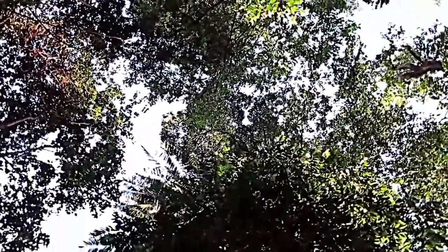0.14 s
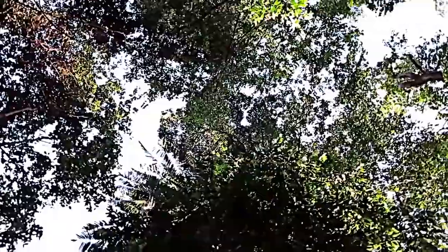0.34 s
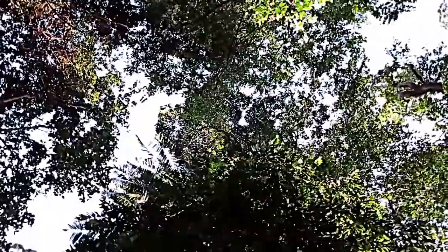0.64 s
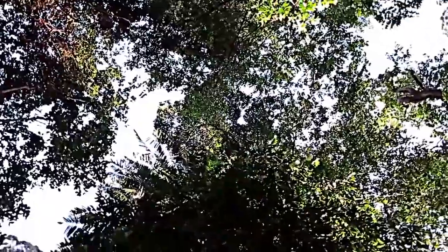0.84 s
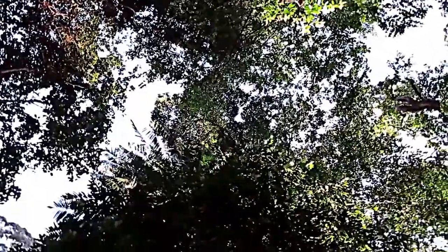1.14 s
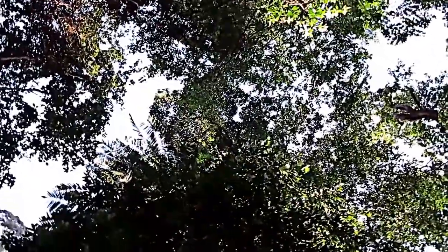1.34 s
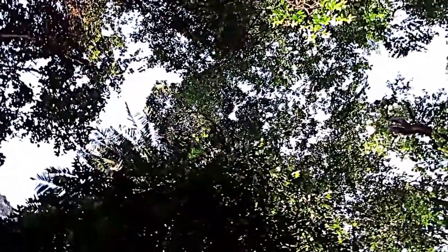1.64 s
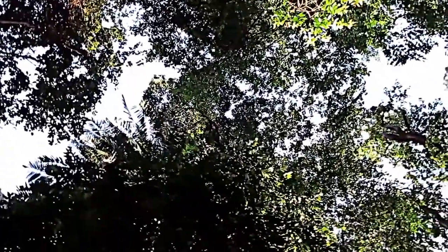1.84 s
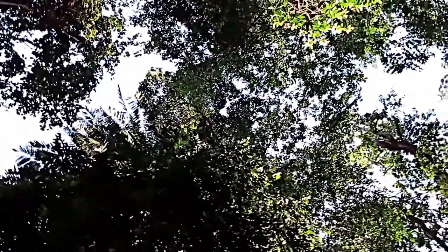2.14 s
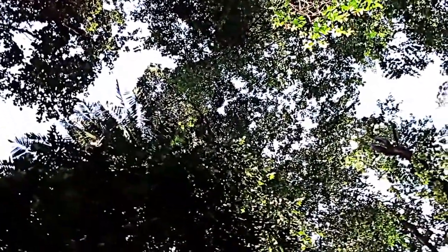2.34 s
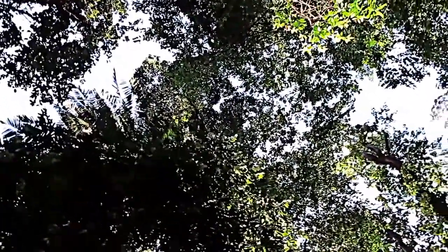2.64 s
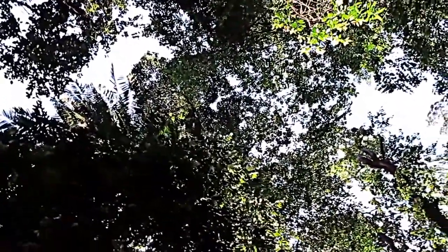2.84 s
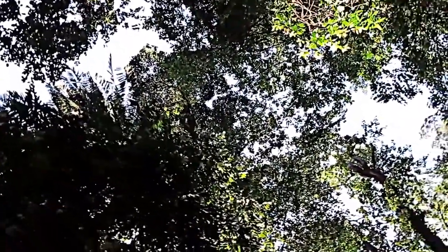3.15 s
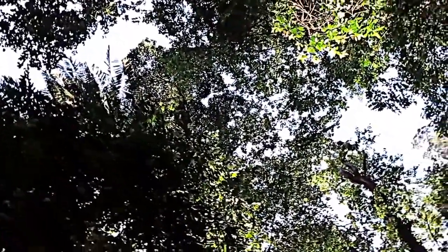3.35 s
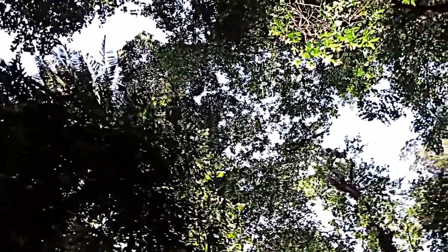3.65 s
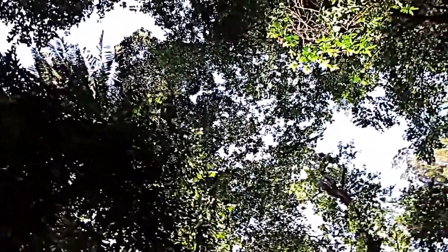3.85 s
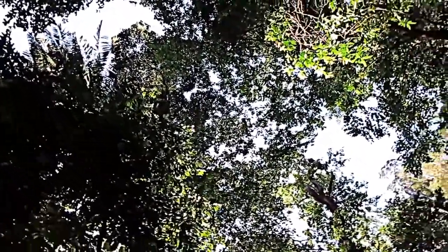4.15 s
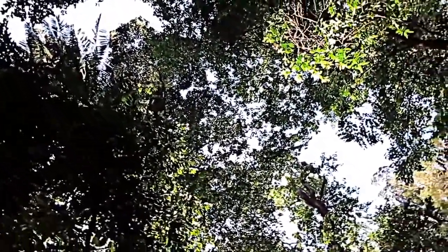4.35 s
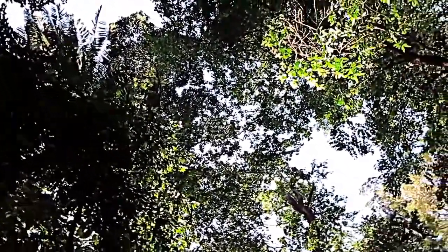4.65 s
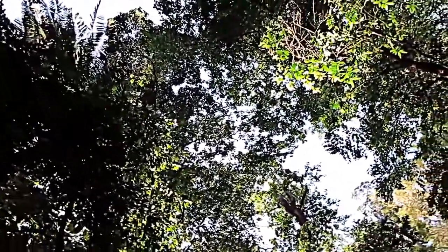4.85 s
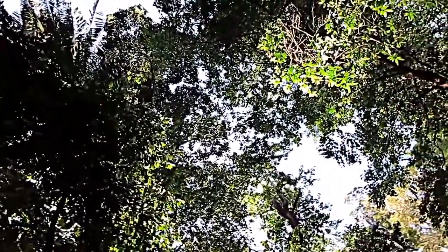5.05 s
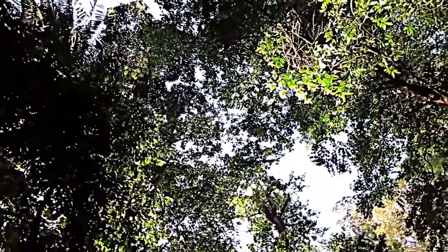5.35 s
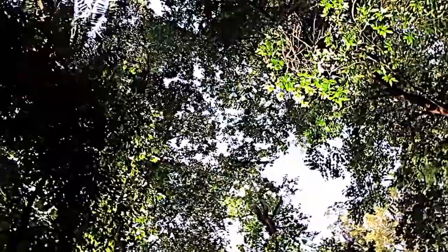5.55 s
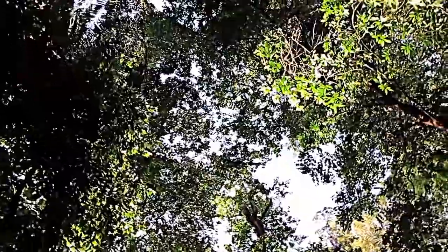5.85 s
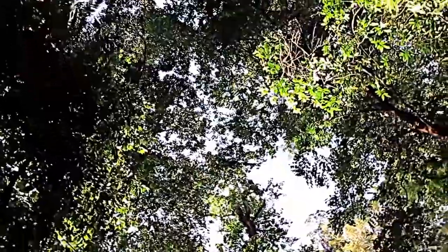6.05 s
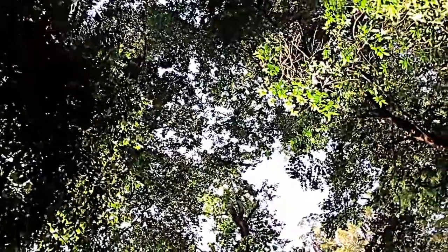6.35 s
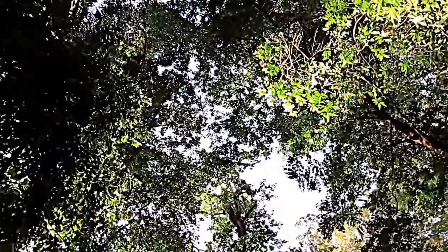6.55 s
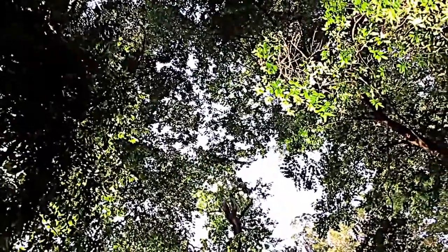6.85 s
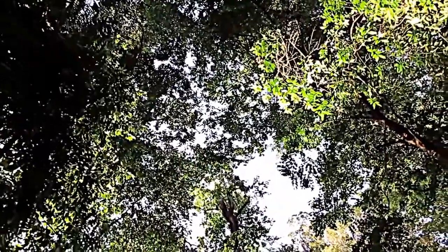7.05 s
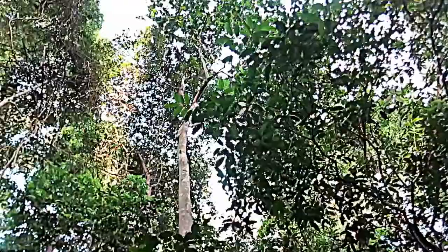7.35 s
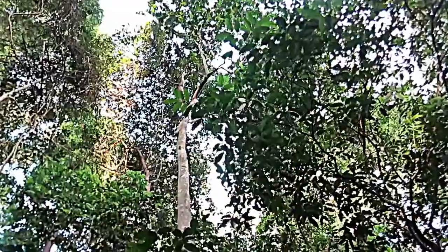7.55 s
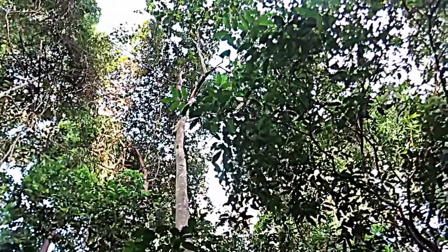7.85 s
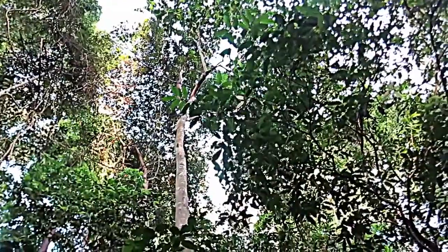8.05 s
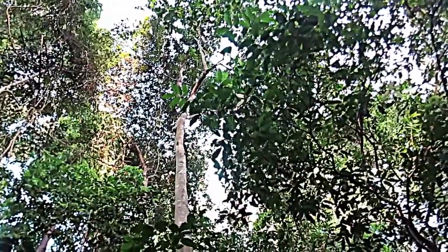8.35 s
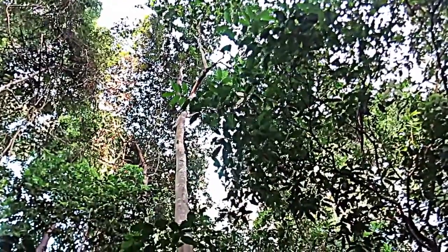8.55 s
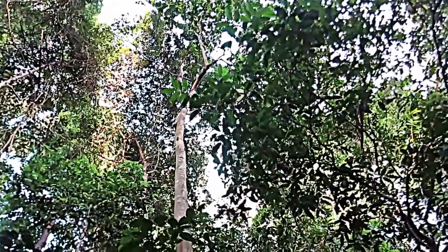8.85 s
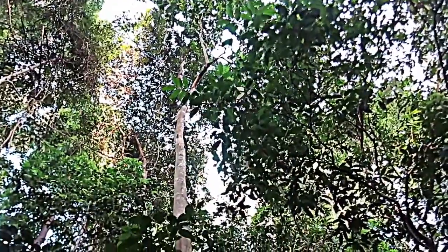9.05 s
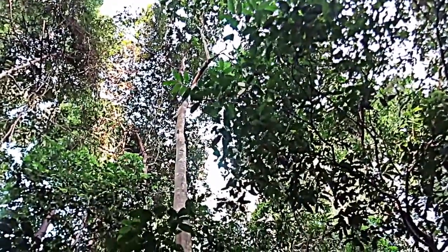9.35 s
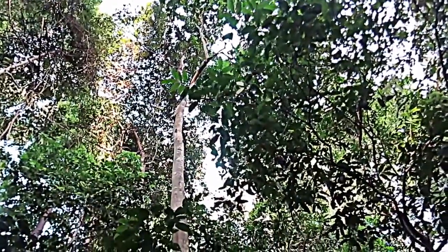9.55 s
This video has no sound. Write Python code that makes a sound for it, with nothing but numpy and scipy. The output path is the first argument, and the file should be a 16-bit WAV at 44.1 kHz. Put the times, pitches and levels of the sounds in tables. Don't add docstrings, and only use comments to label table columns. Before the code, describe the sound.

Among forest trees, a large cicada buzzes loosely, beats a string of rapid bursts, then launches a loud, piercing whine that slowly falls in pitch and breaks into a slowing rattle. A dry tap lands close by and a far bird gives quick rising whistles. After a tiny silent gap, buzz, bursts and whine come again. A patchy far cicada chorus and faint town rumble lie beneath, in wide outdoor stereo.

```python
import sys
import numpy as np
from scipy import signal
from scipy.fft import rfft, irfft, next_fast_len
from scipy.io import wavfile
from scipy.ndimage import uniform_filter1d, map_coordinates

SR = 44100
rng = np.random.default_rng(int(sys.argv[2]) if len(sys.argv) > 2 else 0)


def nominal_scale(level):
    x = np.asarray(level, float) / 20
    return 10 ** x


def to_wav(s):
    ch = np.atleast_2d(s).T
    pcm = np.round(np.clip(ch, -1, 1) * 32767)
    wavfile.write(sys.argv[1], SR, pcm.astype(np.int16))


N = 427769
T = np.arange(N) / SR
SIZE = next_fast_len(N + SR // 2)
CUT_S, RESUME_S = 7.3135, 7.415
RETURN_DB = 1

# whine_onset_s, level_db, upper_resonance_dulling_db, upper_flare_lift_db
PASSES = [
    (1.828, 0.35, 0.16, 8.5),
    (8.66, 0, -3, 4),
]


def evened(x, span=None):
    power = x ** 2 if x.ndim == 1 else (x ** 2).mean(0)
    if span:
        width = int(span * SR)
        mean = uniform_filter1d(uniform_filter1d(power, width), width)
    else:
        mean = power.mean()
    return x / np.sqrt(abs(mean) + 1e-20)


def read(points, hz, **ends):
    f, value = np.transpose(points)
    return np.interp(np.log(hz + 1), np.log(f + 1), value, **ends)


def colour(points):
    hz = abs(np.fft.fftfreq(4096, 1 / SR))
    log_gain = np.log(nominal_scale(read(points, hz, left=-80, right=-80)))
    impulse = np.fft.ifft(np.exp(np.conj(signal.hilbert(log_gain)))).real
    return rfft(impulse[:2048], SIZE)


def bump(s, half_s):
    return np.exp(-((T - s) / half_s) ** 2 / 2)


def noise(points, patchy_db):
    # hz, left_right_likeness (0-1)
    likeness = [(30, 0.72), (90, 0.98), (300, 0.83), (700, 0.56), (1500, 0.89), (3000, 1), (6000, 0.28),
                (12000, 0.7)]
    frames, hz = N // 256 + 5, np.fft.rfftfreq(1024, 1 / SR)
    a, b, c, d, patches = rng.standard_normal((frames, 513, 5), dtype=np.float32).T
    patches = uniform_filter1d(patches, size=8, axis=0)
    patches = evened(uniform_filter1d(patches, size=12, axis=1))
    same = np.clip(read(likeness, hz), -1, 1)[:, None]
    left = a + 1j * b
    right = same * left + np.sqrt(1 - same ** 2) * (c + 1j * d)
    level_db = read(points, hz, left=-89, right=-88.5)[:, None] + patchy_db * patches
    z = np.array([left, right]) * nominal_scale(level_db)
    return evened(signal.istft(z, nperseg=1024, noverlap=768)[1][:, :N])


def forest(t60, shared):
    count = SR // 50
    taps = np.zeros((3, 20 * count + 40))
    at = 20 * np.arange(1, count + 1) + rng.integers(0, 20, (3, count))
    sign = rng.choice([-1., 1.], at.shape)
    np.put_along_axis(taps, at, sign * nominal_scale(-60 * at / SR / t60), 1)
    shared = np.clip(shared, 0, 1)
    ears = shared * taps[2] + np.sqrt(1 - shared ** 2) * taps[:2]
    return rfft(ears, SIZE) / np.linalg.norm(taps[0])


def clicks(s, db, jitter_s, scatter_db):
    shake = rng.standard_normal((600, 2))[:len(s)]
    place = (s + jitter_s * shake[:, 0]) * SR
    index = np.floor(place).astype(int)[:, None] + np.arange(-7, 9)
    u = index - place[:, None]
    shape = np.sinc(u) * np.cos(np.pi * u / 16) ** 2
    level = nominal_scale(db + scatter_db * shake[:, 1:])
    return index.clip(0, N - 1).ravel(), (shape * level).ravel()


def summed(parts):
    return rfft(np.bincount(*map(np.concatenate, zip(*parts)), minlength=N), SIZE)


def town_rumble():
    # hz, level_db_per_hz
    spectrum = [(12, -45), (20, -25.5), (80, 1.5), (106, -1.5), (156, -4.5), (235, -3.5), (576, -13),
                (958, -17.5), (1380, -25), (1590, -23.5), (1800, -27.5), (2600, -27), (3380, -54),
                (5720, -120)]
    level_db = -41.5 + RETURN_DB * (T > CUT_S)
    return nominal_scale(level_db) * noise(spectrum, 0.72) * nominal_scale(np.array([[.4], [-.4]]))


def town_hum():
    wander = 3 * evened(uniform_filter1d(rng.standard_normal(N), size=8000))
    return np.sqrt(2) * nominal_scale(-50) * np.sin(2 * np.pi * 112 * T + wander)


def low_insect():
    # time_s, peak_db, half_length_s
    swell_times = [(.3, -57, 0.89), (2.75, -56.5, 0.5), (5.147, -57.5, 0.42), (7.0, -72, 0.39),
                   (7.801, -58, 0.56), (9.7, -65, 0.27)]
    band = noise([(1450, -35), (1540, -6.0), (1640, -2.0), (1750, -34.5)], 2.2)
    return sum(nominal_scale(db) * bump(s, half) for s, db, half in swell_times) * band


def chorus():
    # hz, level_db_per_hz
    spectrum = [(2700, -23.5), (3350, -10.5), (4070, 3.5), (4680, 4.5), (5500, -4.5), (6260, -12),
                (7570, -3.5), (8470, -14), (9300, -12.5), (10300, -28), (12300, -30.5), (13200, -58)]
    # from_s, to_s
    hush_times = [
        (2.15, 4.6),
        (8.95, 9.9),
    ]
    hushed = sum(1. * (T > start) * (T < end) for start, end in hush_times)
    hushed = uniform_filter1d(hushed, size=SR // 4)
    level_db = -30.5 + RETURN_DB * (T > CUT_S) - 4 * hushed
    return nominal_scale(level_db) * noise(spectrum, 1.8) * nominal_scale(np.array([[-1.5], [1.5]]))


def bird():
    # start_hz, end_hz
    rises = [
        (1831, 2820),
        (1753, 2275),
        (2210, 2950),
    ]
    # time_s, peak_db
    whistles = [
        [(1.8248, -38.5), (2.3396, -40.5), (2.5122, -42), (2.6858, -45), (2.8574, -42.5), (3.03, -42), (3.3124, -38.5), (3.7609, -37.5), (3.8901, -43), (4.0547, -39), (4.4987, -40), (4.8279, -38.5), (4.9945, -37), (5.1233, -34.5), (5.8087, -36.5), (5.9434, -39.5), (6.0394, -44.5)],
        [(3.6232, -50), (4.3405, -48), (5.3652, -47), (5.693, -41)],
        [(3.1582, -33)],
    ]
    out, u = np.zeros(N), np.linspace(0, 1, 2000)
    for (start_hz, end_hz), times in zip(rises, whistles):
        hz = start_hz + (end_hz - start_hz) * u ** .8
        tone = np.sin(np.pi * u) ** 0.18 * np.sin(2 * np.pi * np.cumsum(hz) / SR)
        for s, db in times:
            at = int((s - .012) * SR)
            out[at:at + len(u)] += nominal_scale(db) * tone
    echoed = rfft(out, SIZE) * (1 + nominal_scale(1.5) * forest(0.86, 1.0))
    return nominal_scale(-8.0) * irfft(echoed, SIZE)[:, :N]


def tap():
    # time_s, peak_db
    tap_time = [
        (1.538, -22),
    ]
    (s, db), = tap_time
    shell = colour([(300, -12), (700, 3), (1800, 2), (2700, -1), (3300, -24)])
    ring = irfft(summed([clicks(np.array([s]), 0, 0, 0)]) * shell, SIZE)[:N]
    return nominal_scale(db) * ring / abs(ring).max()


def beats(rows):
    s, rate = np.transpose(rows)
    t = np.arange(s[0], s[-1], 1 / SR)
    turns = np.cumsum(np.interp(t, s, rate)) / SR
    at = np.interp(np.arange(int(turns[-1]) + 1), turns, t)
    return at, 1 / np.interp(at, s, rate)


def beat(s, drum, db, jitter_us, scatter_db, spread=1, drift_us=0):
    # after_ms, level_db
    ribs = [
        [(0, 0), (.55, -5), (1.38, -8.5), (1.85, -13)],
        [(0, 0.5), (.81, -5.5), (1.3, -9), (2.02, -7.5)],
    ]
    s = s + jitter_us / 1e6 * rng.standard_normal(600)[:len(s)]
    drift = uniform_filter1d(uniform_filter1d(rng.standard_normal((4, 600)), size=26), size=26)
    rib_clicks = []
    for (after_ms, rib_db), slow in zip(ribs[drum], drift):
        late_s = spread * after_ms / 1e3 + drift_us / 935000.0 * evened(slow)[:len(s)]
        rib_clicks.append(clicks(s + late_s, db + rib_db, jitter_us / 988000.0, scatter_db))
    return rib_clicks


def whine_beats():
    # time_s, beats_per_s
    whine_rates = [
        [(1.83, 161.6)] + [(2.06, 160.1), (2.08, 160.5), (2.36, 158.6), (2.84, 156.9), (4.39, 150.3), (4.72, 148.3)],
        [(8.66, 161.2)] + [(8.9, 159.8), (8.91, 160.2), (9.308, 157.8), (9.7, 156.7)],
    ]
    # time_s, beats_per_s
    neighbour = [
        (8.0, 153),
        (8.68, 150.5),
    ]
    whine, slack = [], []
    for rows, end in zip(whine_rates, (4.76, np.inf)):
        s, cycle = beats(rows)
        jitter_us = 2.4 + 45 * np.clip(1 - (end - s) / .16, 0, 1) ** 2
        tight = np.clip((s - s[0] - .19) / 0.084, 1e-3, 1 - 1e-3)[:, None]
        for drum, late in enumerate((0, .503)):
            at = s + late * cycle
            whine += beat(at, drum, 20 * np.log10(tight), jitter_us, .22, drift_us=36)
            slack += beat(at, drum, 20 * np.log10(1 - tight), 16, 2.5, drift_us=132)
    whine += beat(beats(neighbour)[0], 0, -0.5, 2.9, 0.68, drift_us=51)
    return whine, slack


def rattle_beats():
    # time_s, groups_per_s
    group_rates = [
        [(4.72, 110), (5.02, 104), (5.4, 87.4), (5.9, 70.7), (6.47, 64.7), (7.32, 56)],
    ]
    # after_start_s, level_db
    group = [
        (0, -11),
        (.0032, -10.5),
        (.0064, -18),
    ]
    rattle = []
    for rows in group_rates:
        s = beats(rows)[0]
        for k, (after, db) in enumerate(group):
            rattle += beat(s + after, k % 2, db + 8.0, 109, 0.87, spread=0.46, drift_us=120.3)
    return rattle


def burst_beats():
    # time_s, peak_db
    bursts = [(1.209, -11), (1.275, -17), (1.3342, -9), (1.402, -15), (1.465, -9), (1.5288, -2.5),
              (1.5916, 0), (1.656, -3.5), (1.724, -8), (1.7938, -14), (8.0546, -15), (8.124, -15.5),
              (8.18, -14), (8.2461, -12), (8.308, -15), (8.3723, -15.5), (8.4357, -18), (8.5083, -15),
              (8.5767, -17), (8.6404, -23)]
    after = np.arange(5) / 325
    swell_db = 18.0 - 350 * abs(after - .005)
    out = []
    for s, db in bursts:
        out += beat(s + after, 1, (db + swell_db)[:, None], 156, 0.89, spread=0.783)
    return out


def buzz_beats():
    # from_s, to_s
    spans = [
        (0, 1.19),
        (7.4, 8.03),
    ]
    buzz = []
    for start, end in spans:
        buzz += beat(np.arange(start, end, 1 / 330), 0, 0, 293.0, 2.7)
    return buzz


def drums():
    whine, slack = whine_beats()
    return summed(whine), summed(rattle_beats() + burst_beats()), summed(slack + buzz_beats())


def posture():
    # after_whine_onset_s, effort_db, abdomen_slackness (0-1)
    phrase = [(-1.75, -27.5, 0.65), (-1.41, -29.5, 0.85), (-1.19, -27.5, 0.96), (-0.81, -28, 0.98),
              (-0.48, -26, 0.41), (-0.35, -24, 0), (-0.13, -28, 0.28), (0.07, -32, .75), (.13, -34, 0.97),
              (0.1962, -34, 1), (0.26, -21, 0.1), (0, -18.5, 0.02), (3, -17, 0.1), (3, -20, 0),
              (4.5, -23, 0.29), (5.5, -24.5, .45)]
    # time_s, change_db, half_length_s
    swells = [(.41, 4, 0.026), (0.57, -3, 0.16), (2.183, -2.5, 0.02), (2.572, 1.5, .06), (3.297, -1, 0.036),
              (3.925, 3, 0.043), (4.057, -2.5, 0.099), (4.35, 0.5, 0.037), (4.612, 0.5, 0.089),
              (7.45, -0.5, 0.11), (8.604, 2.5, 0.068), (9.008, 1, 0.088)]
    # tight_db, slack_db, bend (exponent), added_in_rattle_db
    stances = [
        (-10.5, 7.5, 1.08, 0.2),
        (-51.5, -7.5, 0.63, -6),
        (-37.5, -23.5, 0.38, 5.5),
        (-3.5, -7, 2.6, 0.8),
    ]
    onset, level_db, dull_db, lift_db = np.transpose(PASSES)[:, (T > CUT_S).astype(int)]
    s, effort_db, slack = np.transpose(phrase)
    since = T - onset
    slack = np.interp(since, s, np.clip(slack, 1e-3, 1.2))
    rattling = np.clip((since - 2.75) / .15, 0, 1)
    rattling = rattling + (since > -0.55) * (since < 0)
    rise_s, fall_s = .17, .035
    flare = np.exp(-np.where(since < 0, -since / rise_s, (since / fall_s) ** 2 / 2))
    body_db = np.interp(since, s, effort_db) + level_db
    body_db = body_db + sum(db * bump(at, half) for at, db, half in swells)
    upper_db, lowest_db, top_db, pan_db = (tight + (loose - tight) * slack ** bend + extra * rattling
                                           for tight, loose, bend, extra in stances)
    return body_db, upper_db + dull_db + lift_db * flare, lowest_db, top_db + 19 * flare, pan_db


def glide(drive):
    from_hz, to_hz, fall_s = 9200, 6900, 0.03
    width_hz, db = 2000, -26.5
    out, t = np.zeros(N), np.arange(SR // 3) / SR
    hz = to_hz + (from_hz - to_hz) * np.exp(-t / fall_s)
    turn = np.exp(2j * np.pi * np.cumsum(hz) / SR)
    pole = np.exp(-np.pi * width_hz / SR)
    for onset, level_db, *_ in PASSES:
        at = int((onset - .006) * SR)
        still = drive[at:at + len(t)] / turn
        rung = (turn * signal.lfilter([1], np.poly(3 * [pole]), still)).real
        envelope = np.minimum(t / 0.011, 1) * np.exp(-(t / .17) ** 2)
        out[at:at + len(t)] = nominal_scale(db + level_db) * evened(rung) * envelope
    return rfft(out, SIZE)


def at_ears(left, right):
    # hz, phase_radians
    housing = [(5000, 0), (6200, -.5), (7000, -1.3), (7800, -2.4), (9000, -3)]
    # time_s, left_ear_lead_us
    lead = [(0, 67), (1.5, 58.5), (3.2, 45.5), (5, -8.5), (9.7, 7.5)]
    turn = np.exp(1j * read(housing, np.fft.rfftfreq(SIZE, 1 / SR)))
    right = irfft(rfft(right, SIZE) * turn, SIZE)[:N]
    lead_us = np.interp(T, *np.transpose(lead))
    return np.array([left, map_coordinates(right, [(T - lead_us / 1110000.0) * SR], order=2)])


def singer():
    # hz, level_db_per_hz
    body = [
        [(1710, -63.5), (2900, -38), (3300, -25), (3860, -3.5), (4580, 2.5), (4890, 2.5), (5240, -9), (5480, -49), (5700, -52), (7410, -51), (12500, -120)],
        [(1710, -71), (2900, -34), (3530, -7), (3760, -1), (4080, -2.5), (4550, 2.5), (4820, 2.5), (5400, -19.5), (5700, -32), (7410, -64), (12500, -120)],
        [(1820, -58.5), (3100, -9), (3710, -3), (4210, 2), (5040, -2.5), (5700, -7.5), (7410, -38), (12500, -120)],
    ]
    upper = [
        [(3290, -45), (5600, -11.5), (6270, -4.5), (6790, -3.5), (7640, 0), (9070, -8.5), (9600, -17), (10200, -32), (13300, -73), (22000, -120)],
        [(3290, -42), (5600, -9), (7400, 2.5), (7860, -3), (8120, -6.5), (9270, -7), (9680, -30.5), (10200, -21), (13300, -60), (22000, -120)],
        [(3290, -36), (5600, -15.5), (6400, 1.5), (6980, 1.5), (8260, -3), (8970, -17.5), (10200, -21), (13300, -51), (22000, -120)],
    ]
    lowest = ([(2500, -32), (2850, 1), (3200, 8), (3600, -37)],) + 2 * ([(1750, -19), (1950, -10.5),
              (2500, -5.5), (2900, -5.5), (3200, 2.5), (3600, -11)],)
    top = ([(9500, -26), (10000, -4), (11000, -22), (12200, -17.5), (13200, -26),
           (14000, -43)],) + 2 * ([(9500, -26), (10000, 2.0), (10500, -5.0), (11600, 0), (12400, -5.0),
           (13200, -22), (14000, -51)],)
    body_db, upper_db, lowest_db, top_db, pan_db = posture()
    drives, echoes, out = drums(), forest(.26, .52), 0
    # spectra, level_db, echo_db, sidedness (share of the balance)
    resonances = ((body, 0, .4, 1.1), (upper, upper_db, -.7, .85),
                  (lowest, lowest_db, 1.5, .4), (top, top_db, 1.2, .15))
    for shapes, db, wet_db, sided in resonances:
        rung = sum(drive * colour(points) for drive, points in zip(drives, shapes))
        heard = evened(irfft(rung * (1 + nominal_scale(wet_db) * echoes), SIZE)[:, :N], span=0.069)
        side_db = sided * np.array([pan_db, -pan_db]) / 2
        out = out + nominal_scale(body_db + db + side_db) * heard
    sweep = irfft(glide(irfft(sum(drives), SIZE)) * (1 + echoes), SIZE)[:, :N]
    left, right = out + nominal_scale([[-3.5], [3.5]]) * sweep
    return at_ears(left, right)


def scene():
    background = town_rumble() + town_hum() + low_insect() + chorus()
    return background + bird() + tap() + singer()


def top_cut(x):
    return signal.sosfilt(signal.butter(12, 13980, fs=SR, output="sos"), x)


def record(dry):
    span = int(0.29 * SR)
    power = uniform_filter1d(uniform_filter1d((dry ** 2).mean(0), span), span)
    loud_db = 10 * np.log10(power + 1e-12)
    dry = dry / nominal_scale(.45 * (loud_db + 24))
    remnant = nominal_scale(-49) * (T < CUT_S + .016)
    fade_in = np.clip((T - RESUME_S) / 0.0092, 0, 1)
    running = np.where(T < CUT_S, 1, np.maximum(remnant, fade_in))
    dry = signal.sosfilt(signal.butter(2, 42, "high", fs=SR, output="sos"), dry)
    return top_cut(dry * running)


dry = scene()
out = record(dry)
to_wav(out)
```